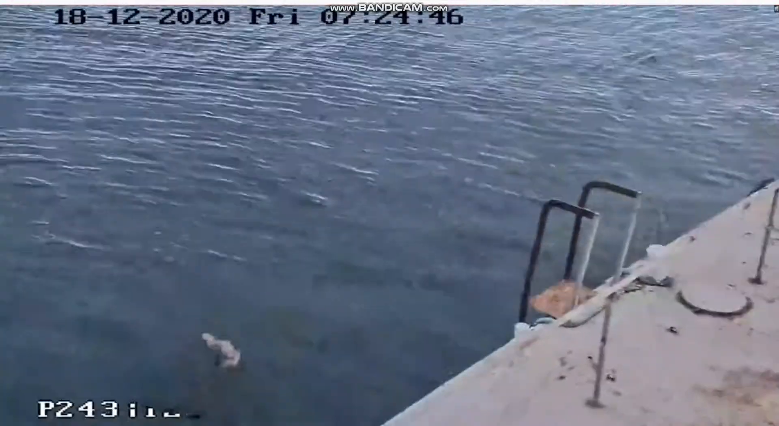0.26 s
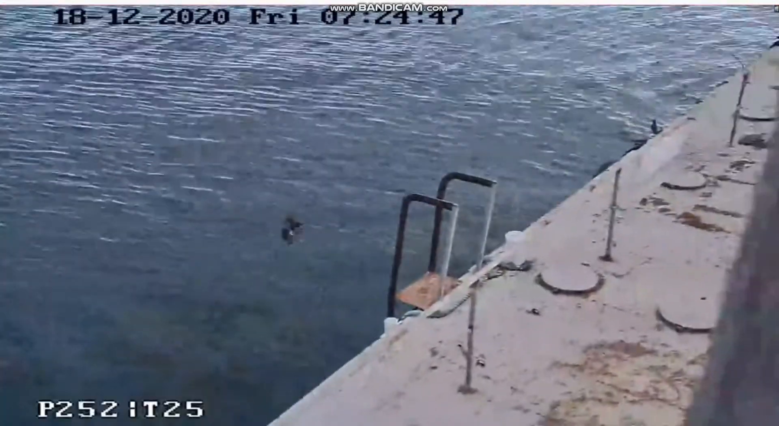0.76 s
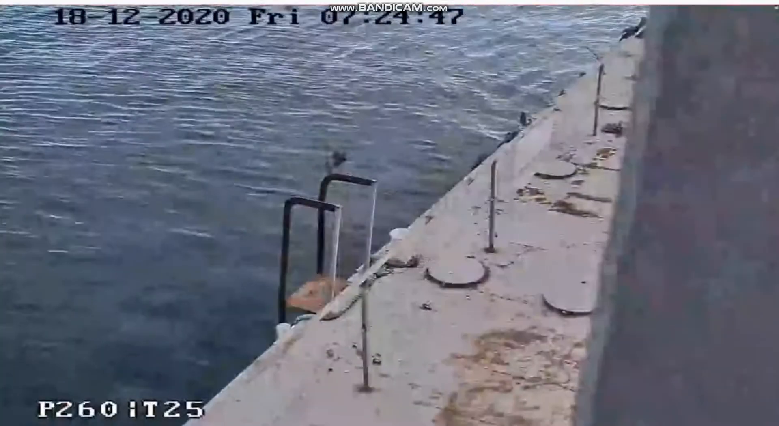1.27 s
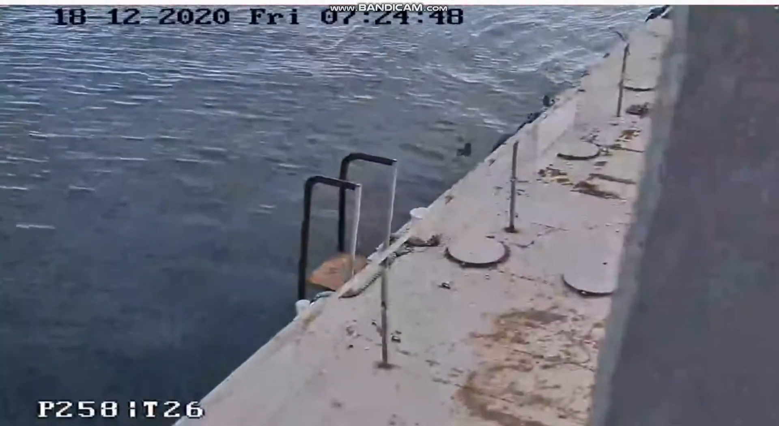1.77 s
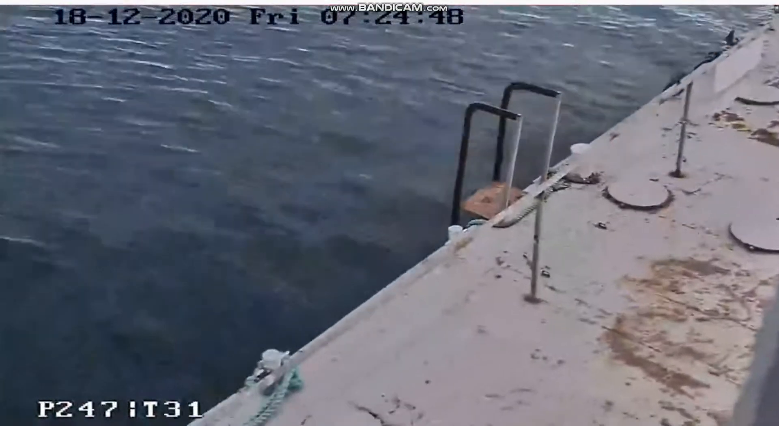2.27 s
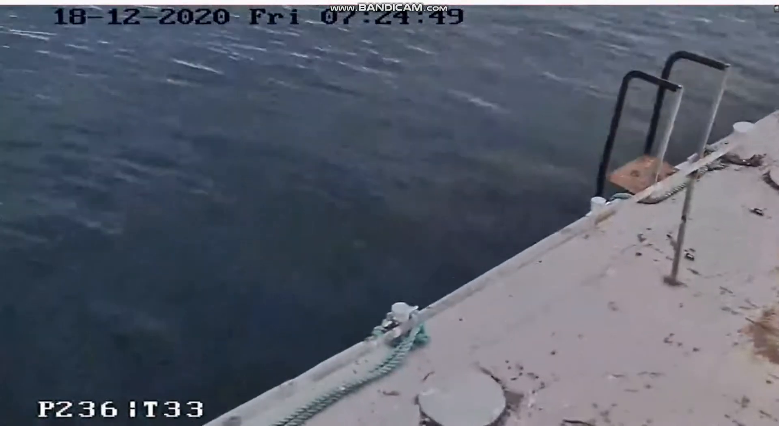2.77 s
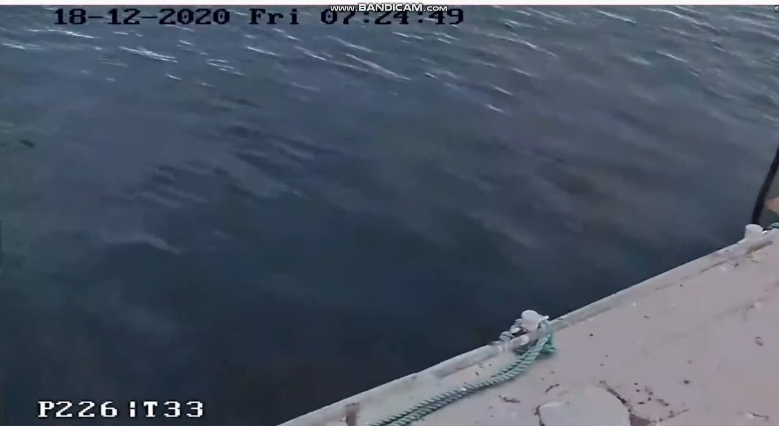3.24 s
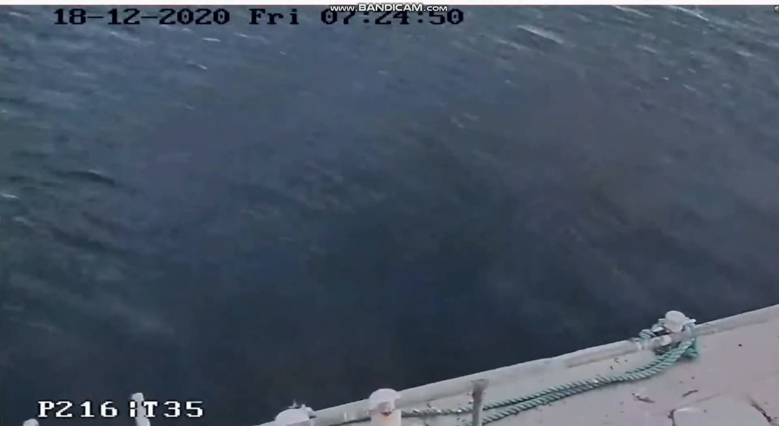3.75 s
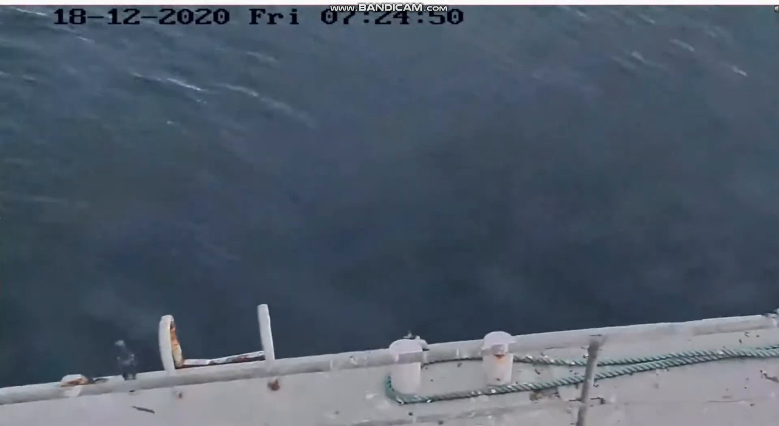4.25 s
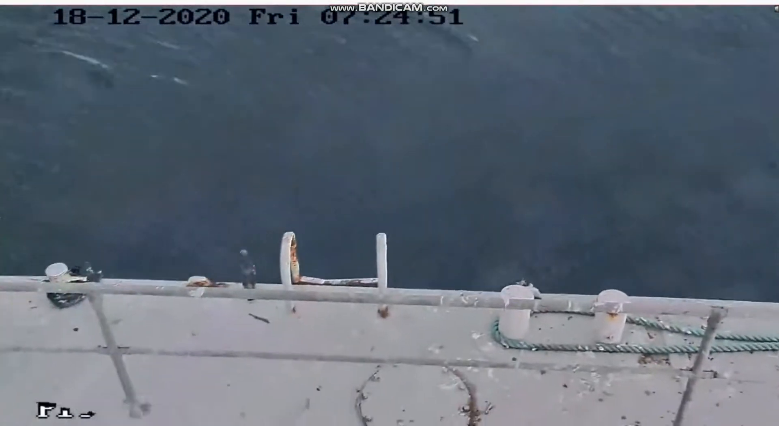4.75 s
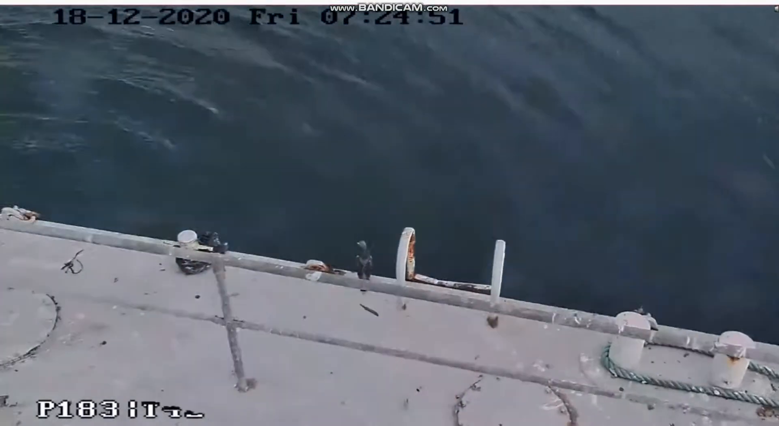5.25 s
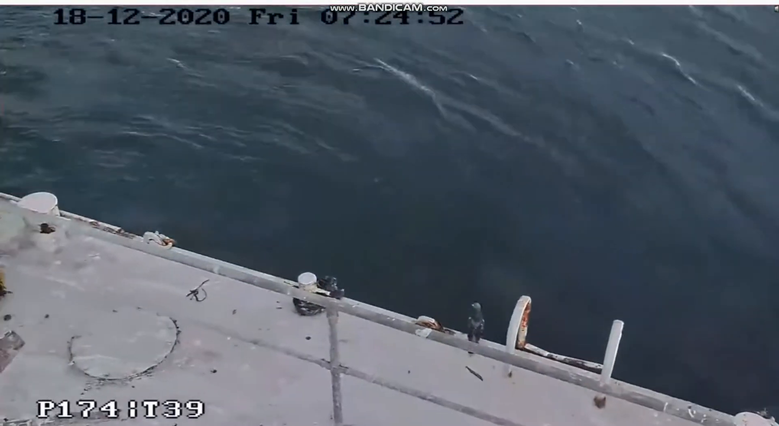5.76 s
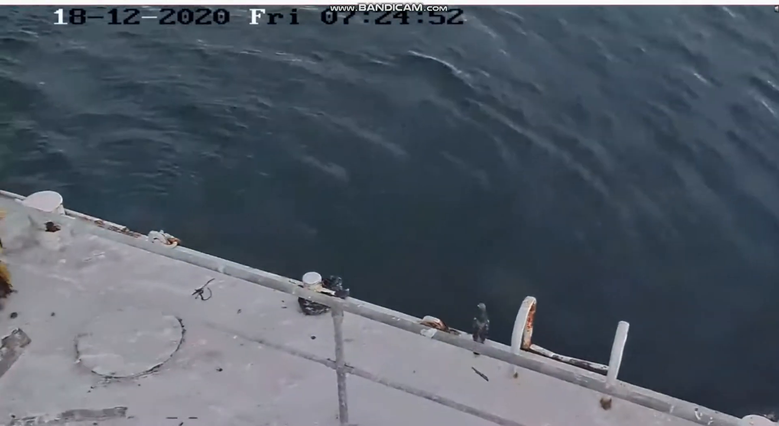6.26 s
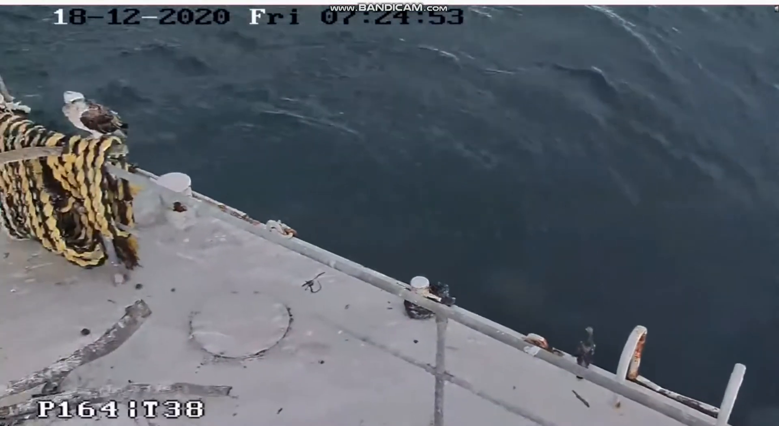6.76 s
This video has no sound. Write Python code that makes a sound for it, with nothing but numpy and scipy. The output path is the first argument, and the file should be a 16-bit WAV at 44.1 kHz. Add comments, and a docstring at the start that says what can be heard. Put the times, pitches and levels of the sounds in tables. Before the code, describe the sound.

A coarse, telephone-like outdoor camera microphone picks up wind all the way through: soft low thumps, irregular crackle, sharp ticks and a low rush, with faint hum and hiss. A seabird chirps in a quick cluster at about 0.3-0.6 seconds, again at 0.8-1.0, then singly near 1.6 and 2.5. Wind flutters harder around 2.6-3.6, as three quick chirps at 3.5 lead into the first long, nearly pure whistle, rising from 3.6 to 4.0. A second, stronger one climbs from 4.4 to 4.95; a third wavers and sinks from 5.3 to 5.8. Each cracks, flicks downward and rasps out, with rough second tones joining in. A short deck slap and thin echo over water trail the calls, and mirrored overtones make them glassy. A wind bump hits at 6.06; barely audible hoarse chirps come near 6.35 and 6.65 as the breeze eases until 7.

```python
"""Seabird by a moored barge

Scattered short chirps lead to three long high whistles that crack and fall; two faint rough chirps follow.
The voice is a set of near-sines with shaken pitch and strength, echoed by a steel deck and open water.
Shaped noise makes the wind on an outdoor surveillance camera's microphone: puffs, ticks and a low rush.
A faint hum and hiss lie beneath. The camera samples at telephone rate and stretches that coarsely,
so each whistle has bright mirror tones."""
import sys
import numpy as np
from scipy import signal
from scipy.fft import rfft, irfft, next_fast_len
from scipy.io import wavfile
from scipy.ndimage import uniform_filter1d

SR = 44100
rng = np.random.default_rng(int(sys.argv[2]) if len(sys.argv) > 2 else 0)


def master_out(mix):
    """Clip the mix to full scale and print it as 16-bit PCM to the path in sys.argv[1]."""
    frames = np.transpose(np.atleast_2d(mix))
    ceiling = np.clip(frames, -1, 1)
    pcm = np.round(ceiling * 32767).astype(np.int16)
    wavfile.write(sys.argv[1], SR, pcm)


N = 309573
TIME = np.arange(N) / SR


def bird():
    """Long whistles, chirps and the second tone of the syrinx, heard across the deck."""
    voice = long_whistles() + chirps() + second_tone()
    return barge(from_db(3.0) * voice, tail_db=-33.5, t60=0.85, slap_db=-15.5, slap_s=0.027, dull_hz=3375)


# held part of each long whistle, one list per whistle; levels before the whistle and voice gains:
# time_s, pitch_hz, level_db
HELD_WHISTLES = [
    [(3.646, 2403, -47.5), (3.656, 2415, -45), (3.75, 2499, -48), (3.798, 2572, -41.5),
     (3.856, 2615, -41.5), (3.886, 2660, -49), (3.944, 2773, -44.5)],
    [(4.402, 2670, -50), (4.418, 2780, -42), (4.444, 2812, -42.5), (4.468, 2637, -52.5), (4.492, 2695, -54),
     (4.554, 2707, -46), (4.608, 2801, -43), (4.644, 2870, -44.5), (4.696, 2867, -40), (4.758, 2942, -43),
     (4.782, 2980, -40.5), (4.792, 3030, -47), (4.84, 2977, -36.5), (4.882, 3090, -50), (4.896, 3156, -39),
     (4.902, 3230, -43)],
    [(5.305, 2843, -45), (5.327, 2996, -39.5), (5.355, 2964, -38), (5.375, 2796, -44), (5.393, 2778, -42.5),
     (5.455, 2855, -44.5), (5.539, 2789, -41), (5.573, 2823, -44), (5.629, 2755, -39.5), (5.667, 2693, -44),
     (5.695, 2690, -51), (5.733, 2736, -43.5), (5.741, 2663, -48.5)],
]
# how each long whistle begins and ends; levels before the voice gain, dying_s counts from the top of the crack:
# scoop_s, scoop_db, crack_s, crack_db, climb_hz, flick_db, dying_s
WHISTLE_GESTURES = [(0.0082, -61.5, .055, -45.5, 160, -44.5, .055),
                    (0.014, -57.5, .058, -47.5, -0.5, -35, .032),
                    (0.018, -46.5, .121, -45.5, 79, -42.5, 0.036)]


def long_whistles():
    """Nearly pure tones from the syrinx, with a weak octave."""
    calls = [long_call(held, gesture) for held, gesture in zip(HELD_WHISTLES, WHISTLE_GESTURES)]
    return whistle(calls, octave_db=-10.5, jitter_hz=278, flutter=1.0, rasp_hz=337)


WHISTLE_GAIN_DB, HELD_RASP, SPLIT_ROUGHENS = 3.5, 0.015, 0.041
# the scoop comes from below: pitch as a share of the held note
SCOOP_FROM, SCOOP_TO, SCOOP_START_DB, SCOOP_RASP = 0.73, 0.77, -58, 0.44
# a jump of register is brief, weak and rough
BREAK_S, BREAK_DIP_DB, BREAK_RASP, CRACK_RASP, STRAIN_RASP = 0.004, -11, 0.5, 0.06, 0.15
# one loud downward flick ends the crack: pitch as a share of the crack's top
FLICK_S, FLICK_FROM, FLICK_TO, FLICK_RASP = 0.0033, 0.94, 0.9, 0.04
# after the flick the voice drops and rasps out: pitch as a share of the crack's top
FALL_S, FALL_TO, FALL_DB = 0.009, 0.76, -51.5
DYING_TO, DYING_DB, DYING_RASP = 0.71, -62, 0.6


def long_call(held, gesture, count=200):
    """Scoop, held whistle, crack, downward flick and dying rasp: rows of time_s, pitch_hz, level_db, rasp."""
    scoop_s, scoop_db, crack_s, crack_db, climb_hz, flick_db, dying_s = gesture
    t = np.linspace(held[0][0], held[-1][0], count)
    hz, db = in_time(held, t)
    first_s, last_s, first_hz, last_hz = t[0], t[-1], hz[0], hz[-1]

    # the held tone roughens where the second tone joins in
    splitting = sum(np.interp(t, [s, s + length / 2, s + length], [0, 1, 0])
                    for s, length, *_ in SECOND_TONES)
    held_rasp = HELD_RASP + SPLIT_ROUGHENS * np.minimum(splitting, 1)
    hold = np.column_stack([t, hz, db + WHISTLE_GAIN_DB, held_rasp])

    scoop = [(first_s - scoop_s, SCOOP_FROM * first_hz, SCOOP_START_DB, BREAK_RASP),
             (first_s - BREAK_S, SCOOP_TO * first_hz, scoop_db, SCOOP_RASP)]

    top_s, top_hz = last_s + crack_s, last_hz + climb_hz
    crack = [(last_s + BREAK_S, last_hz, crack_db + BREAK_DIP_DB, BREAK_RASP),
             (last_s + crack_s / 2, last_hz + climb_hz / 2, crack_db, CRACK_RASP),
             (top_s, top_hz, crack_db + BREAK_DIP_DB / 2, STRAIN_RASP)]

    flick_start = top_s + BREAK_S
    flick_end = flick_start + FLICK_S
    fall = [(flick_start, FLICK_FROM * top_hz, flick_db, FLICK_RASP),
            (flick_end, FLICK_TO * top_hz, flick_db, FLICK_RASP),
            (flick_end + FALL_S, FALL_TO * top_hz, FALL_DB, DYING_RASP),
            (top_s + dying_s, DYING_TO * top_hz, DYING_DB, DYING_RASP)]
    return np.vstack([scoop, hold, crack, fall])


# short notes, levels before the voice gain:
# start_s, length_s, first_hz, middle_hz, last_hz, level_db, swell_db, rasp (0-1)
CHIRP_NOTES = [(0.332, 0.069, 2330, 2418, 2270, -52, 2.5, 0.04),
               (0.417, 0.045, 2360, 2450, 2240, -54.5, 5, 0.26),
               (.463, 0.0785, 2650, 2555, 2482, -46.5, 13.5, 0.03),
               (0.537, 0.021, 1760, 1660, 1630, -57.5, -7, 0.16),
               (0.834, 0.021, 2630, 2234, 2140, -50.5, -11, 0.32),
               (0.845, 0.052, 2720, 2620, 2420, -54.5, 4, 0.3),
               (.897, .038, 2420, 2380, 2430, -56.5, -10, 0.08),
               (0.926, 0.029, 1580, 1640, 1610, -68.5, -1, 0.21),
               (1.611, .055, 2800, 1725, 1600, -56, -16.5, 0.24),
               (2.457, 0.063, 2726, 1780, 2490, -47.5, -1, 0.15),
               (3.485, 0.036, 1760, 2374, 1930, -48.5, 16, 0.12),
               (3.521, 0.024, 2030, 2056, 1750, -51.5, -2, 0.3),
               (3.538, 0.1, 1644, 1742, 1910, -55.5, 5, 0.08),
               (6.345, .065, 2300, 2330, 2270, -75, -2.5, 0.83),
               (6.652, 0.062, 2610, 2810, 2750, -74.5, -12, 0.97)]


def chirps():
    """Short arching notes; the lower the note, the stronger its octave."""
    out = np.zeros(N)
    for row in CHIRP_NOTES:
        middle_hz = row[3]
        octave_db = -4 - 0.074 * (middle_hz - 1697)
        note = short_note(*row, attack_s=0.011, release_s=0.013)
        out += whistle([note], octave_db, jitter_hz=290, flutter=0.86, rasp_hz=333)
    return out


# the other side of the syrinx joins in below or above a whistle; levels before the voice gain:
# start_s, length_s, first_hz, middle_hz, last_hz, level_db, swell_db, rasp (0-1), attack_s, release_s
SECOND_TONES = [(3.944, 0.062, 3780, 3890, 3880, -50.5, 0, 0.13, .003, 0.0065),
                (4.457, 0.14, 2130, 2210, 2250, -65.5, 10.5, 0.44, 0.022, .03),
                (4.625, 0.066, 2230, 2240, 2280, -57, 2, 0.6, 0.032, 0.043),
                (4.755, .085, 2310, 2336, 2290, -48.5, 3, 0.2, 0.049, 0.041),
                (4.831, 0.15, 2380, 2390, 2274, -57, -10.5, 0.4, .03, .01),
                (4.774, 0.093, 3820, 3800, 3660, -65.5, -5, .45, 0.016, 0.036),
                (4.906, 0.075, 3700, 3640, 3530, -59.5, -8, .35, 0.0058, .015),
                (5.367, .075, 2300, 2270, 2340, -59.5, -6, .3, 0.038, 0.031),
                (5.463, 0.044, 2260, 2180, 2260, -62, 8, .25, 0.036, .025),
                (5.598, 0.04, 2380, 2240, 2190, -57, 4, 0.24, 0.03, .025),
                (5.739, 0.074, 3670, 3670, 3690, -47.5, -0.5, 0.07, 0.0032, .003),
                (5.805, 0.075, 3680, 3755, 3890, -46, -6.5, 0.1, .003, 0.033)]


def second_tone():
    """The other side of the syrinx sounds its own short, almost octave-free notes."""
    notes = [short_note(*row) for row in SECOND_TONES]
    return whistle(notes, octave_db=-33.5, jitter_hz=207, flutter=0.7, rasp_hz=233)


def short_note(start, length, first_hz, middle_hz, last_hz, db, swell_db, rasp, attack_s, release_s, count=41):
    """A note arches through three pitches and swells: rows of time_s, pitch_hz, level_db, rasp."""
    age, place = np.linspace(0, length, count), np.linspace(-1, 1, count)
    end_hz = np.where(place < 0, first_hz, last_hz)
    pitch = middle_hz + (end_hz - middle_hz) * np.abs(place) ** 2.1  # moves fastest at the ends
    attack = np.maximum(1 - age / attack_s, 0) ** 2
    release = np.maximum(1 - (length - age) / release_s, 0) ** 2
    level_db = db + swell_db * place / 2 - 14 * (attack + release)
    return np.column_stack([start + age, pitch, level_db, np.full(count, rasp)])


def whistle(notes, octave_db, jitter_hz, flutter, rasp_hz):
    """A near-sine from the syrinx; rasp shakes its pitch and strength."""
    out = np.zeros(N)
    for note in notes:
        span = slice(int(note[0][0] * SR), int(note[-1][0] * SR))
        t = TIME[span]
        pitch, level_db, rasp = in_time(note, t)
        shaken_hz = pitch + jitter_hz * rasp * drift(rasp_hz, size=len(t))
        phase = 2 * np.pi * np.cumsum(shaken_hz) / SR
        strength = from_db(level_db) * (1 + flutter * rasp * drift(rasp_hz, size=len(t)))
        fade = np.clip(np.minimum(t - t[0], t[-1] - t) / 0.002, 0, 1)
        out[span] += fade * strength * (np.sin(phase) + from_db(octave_db) * np.sin(2 * phase))
    return out


def barge(x, tail_db, t60, slap_db, slap_s, dull_hz):
    """A dense early slap from the steel deck and a thin tail over the water; both lose their top."""
    t = TIME[:SR]
    tail = rng.standard_normal(SR) * from_db(-60 * t / t60) * (t > 0.012)
    slap = rng.standard_normal(SR) * np.exp(-t / slap_s) * (t > 0.004)
    response = (from_db(tail_db) * rms_one(tail) + from_db(slap_db) * rms_one(slap)) / np.sqrt(SR)
    dulled = signal.sosfilt(signal.butter(8, dull_hz, fs=SR, output="sos"), x)
    return x + signal.fftconvolve(dulled, response)[:N]


def wind():
    """Eddies on the microphone: puffs, the breeze between them and sharp ticks."""
    gusts = puffs(thump_db=0.0, crackle_db=-1.0, thump_width=0.38, crackle_width=0.43, spiky_db=7.0)
    rush = breeze(rush_db=-1.5, crackle_db=-1.5, lumpy_db=5.5, spiky_db=6.0)
    return gusts + rush + ticks(level_db=-2, decay_s=0.0021)


# strongest wind puffs, levels before trims; each layer scales length_s by its width:
# time_s, thump_db, crackle_db, length_s
STRONG_PUFFS = [(.019, -50.5, -60, 0.0078), (.048, -47.5, -63.5, 0.0061), (.159, -49, -52, 0.0038),
                (.187, -48.5, -55, 0.015), (.247, -50, -58.5, 0.018), (.338, -52, -56.5, 0.0063),
                (.381, -49, -59, 0.01), (.454, -48, -58, 0.015), (.491, -46, -52, 0.01),
                (.67, -57, -63, 0.015), (.771, -52, -62.5, 0.016), (.887, -46, -56, .0092),
                (.999, -49.5, -68, 0.0087), (1.069, -55, -61.5, 0.022), (1.223, -56, -59, 0.021),
                (1.612, -46, -55, 0.012), (1.671, -50, -54, 0.0058), (1.693, -47.5, -58, 0.0037),
                (1.758, -50.5, -57, 0.011), (1.866, -52, -56.5, 0.01), (1.968, -47.5, -61.5, .019),
                (2.031, -52, -67, 0.0053), (2.127, -50, -55, 0.024), (2.164, -50.5, -55.5, 0.0091),
                (2.314, -41, -56, 0.0041), (2.409, -54.5, -61.5, 0.024), (2.557, -52, -60, 0.03),
                (2.606, -42.5, -56.5, 0.0098), (2.674, -47.5, -54, 0.0095), (2.743, -50, -61, 0.026),
                (2.851, -47.5, -53.5, .009), (2.89, -49, -65, 0.038), (3.042, -56.5, -61.5, .015),
                (3.106, -51.5, -61.5, 0.013), (3.167, -48.5, -54, 0.0047), (3.267, -45.5, -54.5, 0.0042),
                (3.316, -54, -61.5, 0.021), (3.387, -42.5, -57, 0.0088), (3.414, -50.5, -62, 0.015),
                (3.45, -47, -60.5, 0.011), (3.489, -51, -52, 0.0097), (3.547, -46, -55, 0.0073),
                (3.618, -41, -44.5, 0.0024), (3.641, -51, -53, 0.01), (4.262, -51.5, -57.5, 0.0084),
                (4.34, -51.5, -60, 0.02), (4.384, -55.5, -60.5, 0.019), (4.52, -46.5, -54, 0.0077),
                (4.591, -48, -56, 0.0074), (4.835, -52.5, -55.5, 0.022), (5.064, -58, -57.5, 0.0069),
                (5.132, -54, -65, .018), (5.171, -48, -74, 0.0037), (5.414, -50, -59.5, 0.013),
                (5.569, -46.5, -53, 0.0044), (5.82, -47.5, -55, 0.0066), (6.04, -50.5, -60, 0.0069),
                (6.061, -39, -59, 0.004), (6.206, -54, -63.5, 0.021), (6.244, -51, -67, 0.013),
                (6.381, -51, -72, 0.011), (6.593, -51.5, -65.5, 0.02), (6.726, -52, -61, 0.01),
                (6.93, -53.5, -80, 0.0048)]
# relative colour of a puff's thump: freq_hz, gain_db
THUMP_COLOUR = [(20, -40), (50, -24.5), (100, -8.5), (220, 1), (350, -1), (550, -6.5), (900, -17.5),
                (1600, -36.5), (4000, -50.5)]
# relative colour of the crackle in puffs, breeze and ticks: freq_hz, gain_db
CRACKLE_COLOUR = [(200, -8.5), (600, 0.5), (1100, 7), (1700, 5.5), (2400, -1), (3200, -8), (4000, -16)]


def puffs(thump_db, crackle_db, thump_width, crackle_width, spiky_db):
    """Each eddy hits the microphone port as a low thump with a spiky crackle inside."""
    thump_power, crackle_power = np.zeros(N), np.zeros(N)
    for s, low_db, high_db, length in [*STRONG_PUFFS, *weak_puffs()]:
        span = slice(max(int((s - 3 * length) * SR), 0), int((s + 3 * length) * SR))
        age = (TIME[span] - s) / length
        thump_power[span] += from_db(low_db) ** 2 / np.cosh(age / thump_width) ** 2
        crackle_power[span] += from_db(high_db) ** 2 / np.cosh(age / crackle_width) ** 2
    thump = from_db(thump_db) * np.sqrt(thump_power) * evened(noise(THUMP_COLOUR), 0.0091)
    spikes = evened(noise(CRACKLE_COLOUR) * from_db(spiky_db * drift(220)), 0.011)
    return thump + from_db(crackle_db) * np.sqrt(crackle_power) * spikes


def weak_puffs(count=150):
    """Small eddies come at uneven gaps, sized by the breeze: rows like STRONG_PUFFS."""
    slip, size, grit, span = rng.uniform(-0.953, 1, (count, 4)).T
    s = (np.arange(count) + 0.5 + slip / 2) / 17  # 17 eddies a second
    rush_db, crackle_db = in_time(BREEZE_STRENGTH, s)
    thump_db = rush_db + 7 + 2 * size
    crackle_db = crackle_db + 8.5 + 2 * (size + grit)
    length_s = 0.005 * 2 ** span
    return np.column_stack([s, thump_db, crackle_db, length_s])[s < TIME[-1]]


# strength of the breeze, before trims and eddies: time_s, rush_db, crackle_db
BREEZE_STRENGTH = [(0.0, -63.5, -75), (1.04, -65, -75.5), (2.68, -63.5, -76.5), (2.73, -64.5, -76.5),
                   (2.93, -62, -73.5), (3.15, -67.5, -81), (3.46, -61, -70.5), (3.89, -60.5, -72),
                   (4.07, -67, -76.5), (4.67, -62.5, -75.5), (5.53, -67, -76.5), (5.91, -63.5, -74.5),
                   (6.28, -71.5, -82.5), (7.02, -68.5, -84)]
# relative colour of the low rush: freq_hz, gain_db
RUSH_COLOUR = [(15, -26.5), (40, -13.5), (90, -0.5), (200, 2), (350, -4), (550, -11), (900, -15),
               (1600, -28), (4000, -40)]


def breeze(rush_db, crackle_db, lumpy_db, spiky_db):
    """Small eddies swell both the low rush of air and its crackle."""
    rush_level, crackle_level = in_time(BREEZE_STRENGTH, TIME)
    eddies = drift(35)
    rush = from_db(rush_level + rush_db + lumpy_db * eddies) * noise(RUSH_COLOUR)
    spikes = np.minimum(0.79 * eddies + 0.65 * drift(210), 2.4)
    crackle = from_db(crackle_level + crackle_db + spiky_db * spikes) * noise(CRACKLE_COLOUR)
    return rush + crackle


# sharp ticks at the microphone port, levels before the trim: time_s, level_db
PORT_TICKS = [(0.1838, -46), (0.992, -53.5), (1.0933, -43), (1.9593, -39.5), (2.1034, -51), (2.3128, -47.5),
              (2.399, -47), (2.626, -46.5), (2.7363, -43.5), (2.8462, -46), (2.859, -37.5), (2.8757, -45),
              (3.102, -50.5), (3.169, -47), (3.3837, -44), (6.0598, -41), (6.5881, -46.5)]


def ticks(level_db, decay_s):
    """The hardest eddies snap: an instant rise and a crackle that dies in milliseconds."""
    envelope = np.zeros(N)
    for s, db in PORT_TICKS:
        span = slice(int(s * SR), int((s + 0.03) * SR))
        envelope[span] += from_db(db) * np.exp(-(TIME[span] - s) / decay_s)
    return from_db(level_db) * envelope * evened(noise(CRACKLE_COLOUR), 0.0013)


# steady hum, rms levels before the camera's sampling: freq_hz, level_db
HUM_TONES = [(280, -76), (350, -76.5), (450, -77), (550, -83), (600, -85)]


def hum():
    """Faint electrical tones in the camera: steady sines with random phases."""
    out = np.zeros(N)
    for hz, db in HUM_TONES:
        out += from_db(db) * np.sqrt(2) * np.sin(2 * np.pi * (hz * TIME + rng.random()))
    return out


def hiss():
    """A steady faint bed of noise, strongest around 1 kHz."""
    return from_db(-71) * noise([(100, -3.5), (1000, 3.0), (2500, -0.5), (4000, -1)])


def scene():
    """The bird over wind, hum and hiss, as one channel."""
    return (bird() + wind() + hum() + hiss())[None]


# relative colour of the recorder's hiss: freq_hz, gain_db
RECORDER_HISS_COLOUR = [(1000, 0), (6000, -3.5), (8000, -5.5), (10000, 2.5), (13500, 1), (15500, 0),
                        (20000, -1)]
CAMERA_HZ, PLAYBACK_HZ = 8004, 16250
CUTOFF_HZ = 15650


def record(dry):
    """Telephone-rate sampling, two coarse rate changes, a soft top, a trace of hiss and the final cut."""
    band = low_pass(dry[0], 3920)
    narrow = stretched(band, CAMERA_HZ, slope=1.675)
    wide = stretched(narrow, PLAYBACK_HZ, slope=1.996)
    softened = signal.sosfilt(signal.butter(6, 13700, fs=SR, output="sos"), wide)
    recorder_hiss = from_db(-93.0) * noise(RECORDER_HISS_COLOUR)
    return low_pass(softened + recorder_hiss, CUTOFF_HZ)[None]


def stretched(x, rate, slope):
    """A coarse rate change: every tone is mirrored about half the rate, under a falling sinc slope."""
    mirrored = x * (1 + 2 * np.cos(2 * np.pi * rate * TIME))
    size = next_fast_len(N + SR)
    hz = np.arange(size // 2 + 1) * SR / size
    gain = np.abs(np.sinc(hz / rate)) ** slope * (hz < rate)
    return irfft(rfft(mirrored, size) * gain, size)[:N]


def low_pass(x, hz):
    """A steep cut above hz."""
    return signal.sosfilt(signal.ellip(12, 0.1, 90, hz, fs=SR, output="sos"), x)


def from_db(db):
    """Decibels to amplitude."""
    return 10 ** (np.asarray(db) / 20)


def rms_one(x):
    """The signal scaled to rms 1."""
    return x / np.sqrt(np.mean(x ** 2) + 1e-20)


def in_time(rows, t):
    """Each column of a curve, read at the times t."""
    s, *columns = np.transpose(rows)
    return [np.interp(t, s, c) for c in columns]


def noise(spectrum):
    """Noise of the given colour; rms 1."""
    hz, db = np.transpose(spectrum)
    size = next_fast_len(N)
    bins = np.maximum(np.arange(size // 2 + 1) * SR / size, 1)
    gain = from_db(np.interp(np.log(bins), np.log(hz), db))
    return rms_one(irfft(rfft(rng.standard_normal(size)) * gain, size)[:N])


def drift(rate_hz, size=N):
    """Smooth random wandering, low-passed at rate_hz; spread about 1."""
    smooth = signal.butter(2, min(rate_hz, SR / 4), fs=SR, output="sos")
    return rms_one(signal.sosfilt(smooth, rng.standard_normal(size + SR // 2)))[-size:]


def evened(x, span_s):
    """Noise with its own swells taken out, so that an envelope decides its level."""
    return x / np.sqrt(uniform_filter1d(x ** 2, max(int(span_s * SR), 3)) + 1e-6)


dry = scene()
out = record(dry)
master_out(out)
```